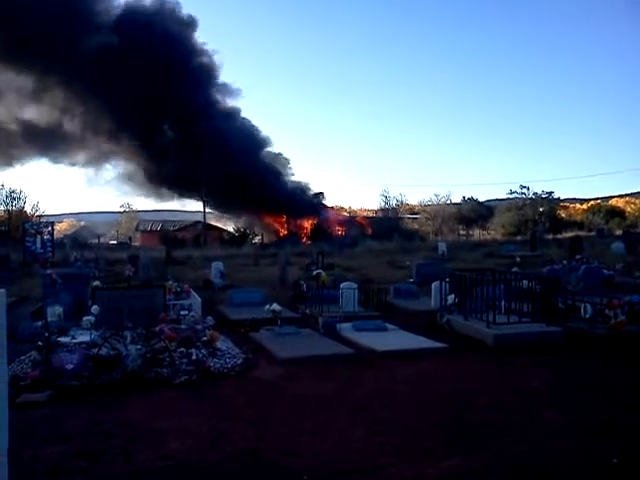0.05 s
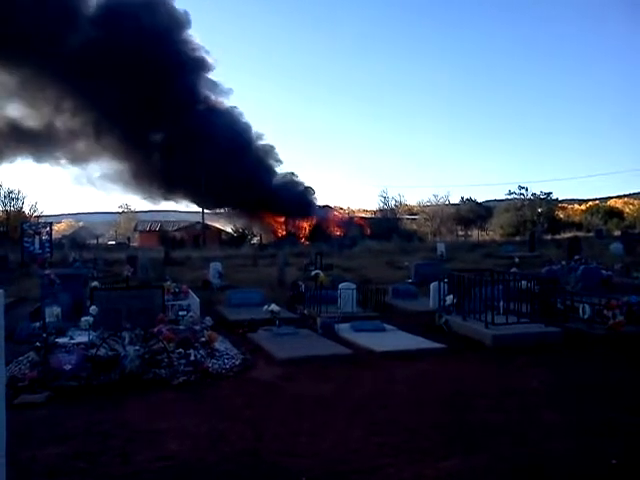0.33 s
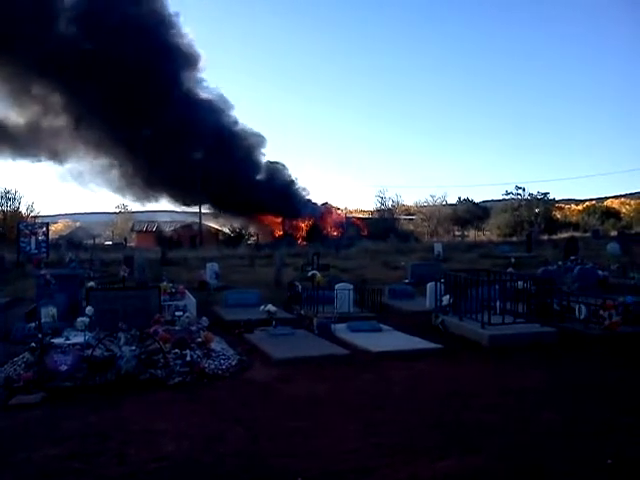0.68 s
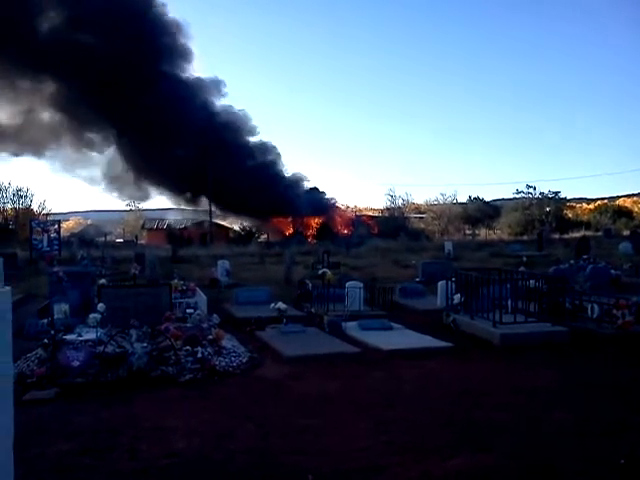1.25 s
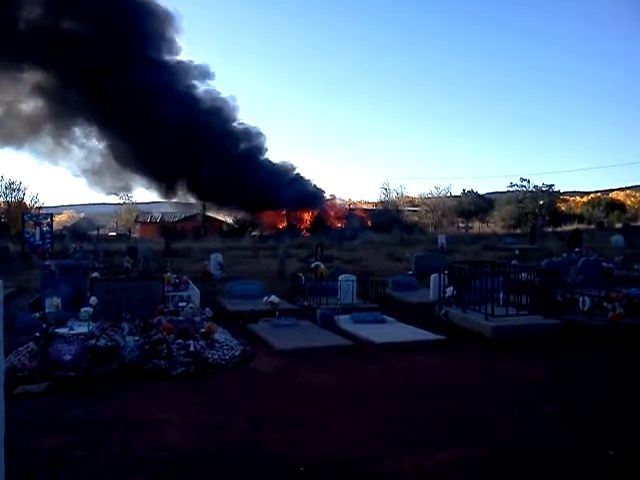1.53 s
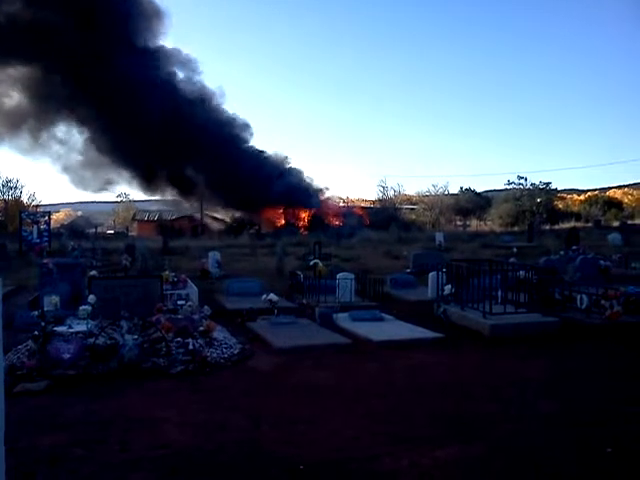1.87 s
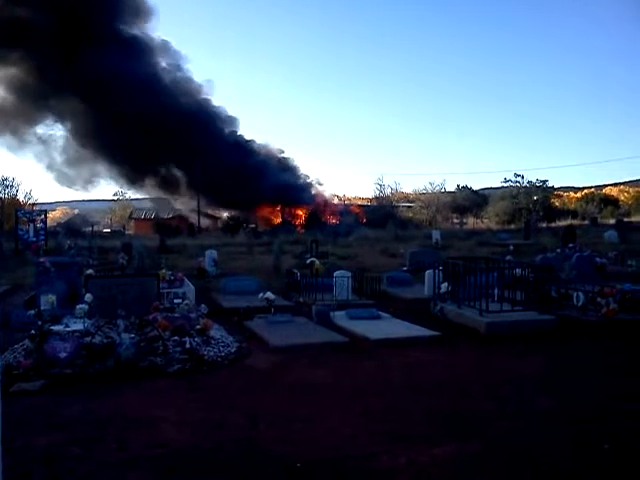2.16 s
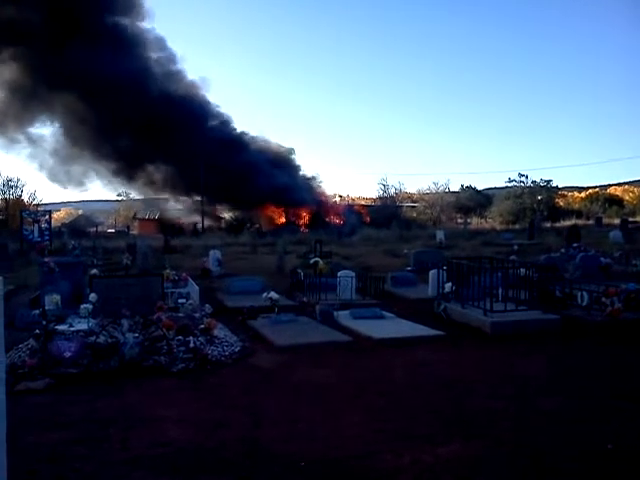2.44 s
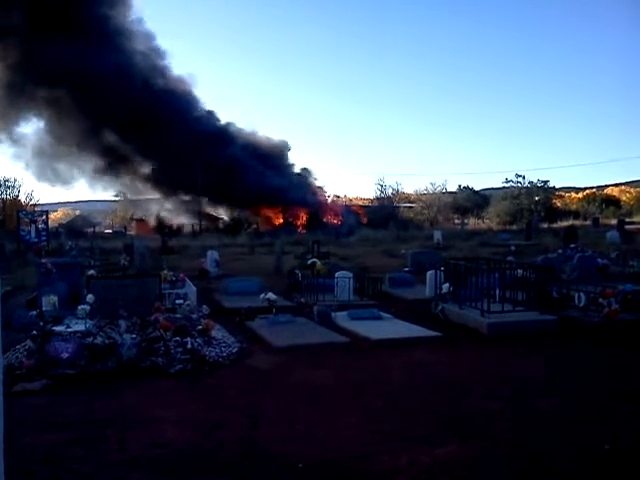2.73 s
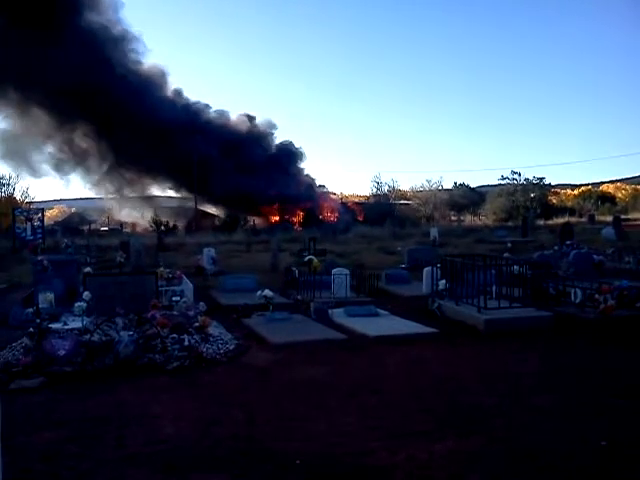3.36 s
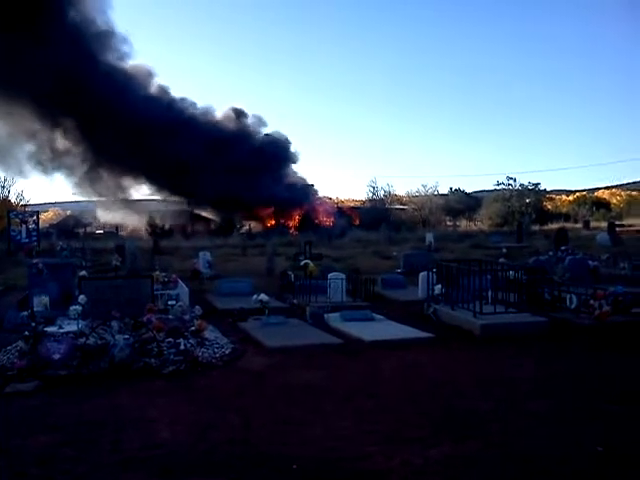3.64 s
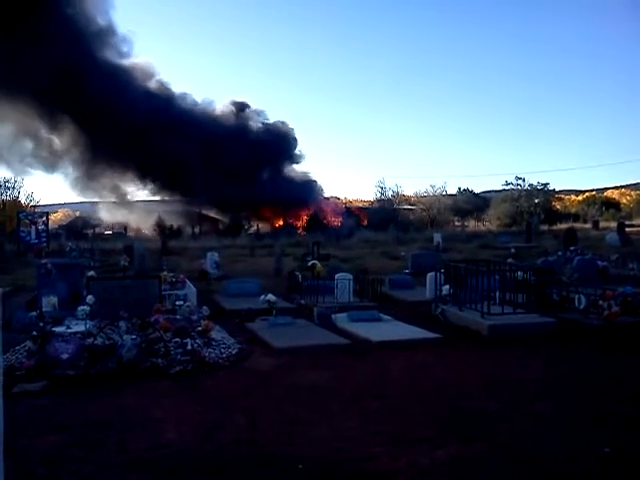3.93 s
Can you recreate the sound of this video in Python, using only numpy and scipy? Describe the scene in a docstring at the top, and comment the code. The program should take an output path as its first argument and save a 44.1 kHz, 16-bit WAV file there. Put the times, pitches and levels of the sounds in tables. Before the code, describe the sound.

A big fire roars low and steady some way off outdoors for all four seconds, with irregular wood crackles throughout, dulled by distance and slightly ringing. Stronger cracks come around 0.9 seconds and between 2 and 2.3. A thin hiss swells at about 1.6 seconds and again at 3.3. At about 3.4 seconds, one loud, sharp, hollow pop echoes briefly while the fire carries on.

```python
"""A big fire across open ground

Swirling flames roar steadily some way off, and a thin hiss comes and goes. Burning timber splits
and crackles throughout. Once, something bursts with a sharp pop that scatters back from the
surroundings. Distance dulls the crackle, and the microphone adds a ringing midrange colour."""
import sys
import numpy as np
from scipy import signal
from scipy.fft import rfft, irfft, next_fast_len
from scipy.io import wavfile
from scipy.ndimage import uniform_filter1d, minimum_filter1d, map_coordinates

SR = 44100
rng = np.random.default_rng(int(sys.argv[2]) if len(sys.argv) > 2 else 0)


def master(y):
    """Save y as 16-bit WAV."""
    cut = np.clip(np.atleast_2d(y).T, -1, 1)
    pcm = np.round(cut * 32767)  # scale
    wavfile.write(sys.argv[1], SR, pcm.astype(np.int16))


N = 4 * SR


def amp(db):
    """Turn decibels into a number to multiply a sound by."""
    return 10 ** (np.asarray(db) / 20)


def unit(x):
    """Scale a signal to an average strength (rms) of 1."""
    return x / np.sqrt(np.mean(x ** 2) + 1e-20)


def curve(rows):
    """Join (time, value) points with straight lines, giving one value per sample."""
    return np.interp(np.arange(N) / SR, *np.transpose(rows))


def wobble(per_s):
    """A smooth curve through per_s random values each second."""
    return map_coordinates(rng.standard_normal(2000), [np.arange(N) * per_s / SR], mode="wrap")


def filtered(x, response):
    """Multiply each frequency in x by response(hz)."""
    size = next_fast_len(N + 8192)
    return irfft(rfft(x, size) * response(np.fft.rfftfreq(size, 1 / SR)), size)[:N]


def noise(spectrum, patchy_db=0):
    """Noise of strength 1 with the given tone; patchy_db makes random patches louder or softer."""
    grid = signal.stft(rng.standard_normal(N), nperseg=512)[2]  # frequency by time
    patches = uniform_filter1d(rng.standard_normal(grid.shape), 6, axis=0)
    patches = uniform_filter1d(patches, 12, axis=1)
    patchy = signal.istft(grid * amp(patchy_db * unit(patches)), nperseg=512)[1][:N]
    f, db = np.transpose(spectrum)
    return unit(filtered(patchy, lambda hz: amp(np.interp(np.log(hz + 1), np.log(f + 1), db, right=-120))))


# How strongly the fire burns: t/s, deep roar level/dB, bright rush level/dB
FLAME_LEVELS = [(0.0, -47.5, -44), (0.39, -45.5, -46), (0.83, -47.5, -47), (1.32, -46.5, -45.5),
                (1.67, -47.5, -45.5), (2.02, -43, -45), (2.35, -46, -46), (2.7, -44.5, -43),
                (2.96, -47.5, -48), (3.15, -46, -46), (3.42, -44.5, -46), (3.73, -48, -43.5),
                (3.88, -47.5, -40.5), (4.0, -47.5, -50)]
# Tone of the deep roar: f/Hz, relative level/dB
DEEP_TONE = [(20, -37), (35, -28.5), (60, -17.5), (140, -12.5), (185, -8), (206, 0.5), (228, -3), (265, -3),
             (305, 2.5), (345, 0.5), (410, -3.5), (520, -1), (700, -2), (900, -3), (1100, -16),
             (1500, -34.5)]
# Tone of the bright rush: f/Hz, relative level/dB
BRIGHT_TONE = [(500, -25), (850, -12), (1080, -5), (1350, -1), (1700, -5.5), (2100, -1.5), (2500, -9),
               (3100, -13.5), (3600, -19), (4200, -35.5), (4600, -66)]


def roar():
    """Swirling flames make a deep, even roar and a brighter rush that flutters more."""
    times, deep_db, bright_db = np.transpose(FLAME_LEVELS)
    deep_gain = amp(curve(np.c_[times, deep_db]) + 0.5 * wobble(30))
    deep = deep_gain * noise(DEEP_TONE, patchy_db=2)
    bright_gain = amp(curve(np.c_[times, bright_db]) - 1.5 + 0.46 * wobble(14) + 1.7 * wobble(130))
    return deep + bright_gain * noise(BRIGHT_TONE, patchy_db=1.43)


# How the hiss comes and goes: t/s, level/dB
HISS_SWELLS = [(0, -69.5), (.7, -71), (1.42, -67.5), (1.62, -56), (2.0, -56.5), (2.08, -71.5), (2.3, -63.5),
               (2.55, -63), (2.9, -69.5), (3.25, -73), (3.305, -47.5), (3.45, -53), (3.65, -59.5), (4, -70)]
# Tone of the hiss: f/Hz, relative level/dB
HISS_TONE = [(750, -18.5), (1150, 7.5), (1700, -4), (2200, -1), (2800, -11), (3250, -2), (3550, 2),
             (3750, -5.5), (4000, -12), (4400, -23), (4700, -59)]


def hiss():
    """A thin, grainy sizzle swells twice over the roar."""
    grain = amp(3.5 * wobble(170))
    return amp(curve(HISS_SWELLS) + 5.5) * unit(grain * noise(HISS_TONE, patchy_db=3))


# The clear cracks, each with a main, a low and a high ring:
# t/s, level/dB, low ring level/dB and high ring level/dB (relative to the main), main ring f/Hz
CLEAR_CRACKS = [(0.0623, -42, 3, -16, 1830), (0.196, -34.5, -12, -20, 2270), (0.413, -32, -13, -3.5, 2040),
                (0.4774, -42, -10, -22, 1890), (0.5763, -33, -11, -12, 2050),
                (0.6028, -29.5, -19, -25.5, 2080), (0.7334, -33, -9, -8.5, 2300),
                (0.7438, -27.5, -13.5, -4, 2054), (0.9084, -20.5, -19, -33, 1975),
                (0.9445, -19.5, 3, -28, 2140), (0.9485, -27.5, 4, -15, 2150), (1.0001, -26.5, 0, -34, 2075),
                (1.1727, -34, -11, -26, 1960), (1.2366, -35, -13, -9, 2000),
                (1.2585, -27.5, -13, -15, 1985), (1.3853, -31, -1, -8, 1800), (1.513, -24.5, -1, -10, 2125),
                (1.5748, -28.5, -13, -3, 2120), (1.7502, -37, -10, -19, 2200),
                (1.8032, -24.5, -10.5, -30, 2014), (2.0517, -18.5, -14, -23, 1913),
                (2.1316, -34.5, -7, -24, 2080), (2.1929, -31, -25.5, -20, 2060),
                (2.2625, -30, -7, -30, 2040), (2.2805, -19.5, 0.5, -32.5, 1994),
                (2.2893, -21.5, -0.5, -27, 2100), (2.3481, -33, 1, -28, 1915),
                (2.3747, -29, -2, -1.5, 2010), (2.5413, -26, -39, -13, 2126), (2.6508, -20, -5, -32, 2030),
                (2.7867, -24.5, -26, -32, 2160), (2.9392, -32.5, 2, -11.5, 2100),
                (3.05, -28, -3, -25, 1920), (3.1183, -34, 1, -13, 2180), (3.1507, -23.5, -13, -25, 2200),
                (3.274, -28.5, -2, -1, 2170), (3.5468, -25, -3.5, -24, 1970),
                (3.7005, -20.5, -8.5, -13, 2110), (3.7444, -35, -7, -15, 2070), (3.7819, -26, -2, -4, 1980)]
# The main, low and high microphone resonances that each crack sets ringing:
# multiple of the main pitch, time to fade by 60 dB/s
CRACK_RESONANCES = [(1, 0.023), (.69, 0.015), (1.36, 0.0042)]
# Tone of the splinters: f/Hz, relative level/dB
SPLINTER_TONE = [(100, -19), (500, -13), (1300, -6.5), (2100, -1), (2900, -7.5), (3700, -18.5),
                 (4500, -44.5)]


def crackle(faint_per_s=96, muffle_hz=4000):
    """Timber splits: each crack sprays splinters, echoes and makes the microphone ring briefly."""
    t = np.arange(SR // 20) / SR
    rise_s, hold_s = 0.0011, 0.0023
    rings, spray, echo_power = np.zeros((3, N))
    splinters = noise(SPLINTER_TONE)
    cracks = list(CLEAR_CRACKS)
    # Add many faint cracks at random, with the same five columns.
    for when, softness, low, high, pitch in rng.random((faint_per_s * N // SR, 5)):
        db = -45.5 - 2 * np.log(max(softness, 0.05))
        cracks.append((when * N / SR, db, 14 * low - 9, 12 * high - 14, 1690 + 620 * pitch))
    for start, db, low_db, high_db, main_hz in cracks:
        gains = amp([0, low_db, high_db])
        gains *= amp(db - 2) / np.linalg.norm(gains)  # the three rings share the crack's level
        for gain, (multiple, fade_s) in zip(gains, CRACK_RESONANCES):
            hz = main_hz * multiple * (1 + 0.015 * rng.standard_normal())  # slightly out of tune
            add(rings, start, gain * strike(t, rise_s, fade_s, hold_s) * np.sin(2 * np.pi * hz * t))
        add(spray, start, amp(db - 11.5) * strike(t, rise_s, fade_s=0.016, hold_s=hold_s))
        add(echo_power, start, (amp(db - 26.5) * strike(t, rise_s=0.0018, fade_s=0.09)) ** 2)
    sound = rings + (spray + np.sqrt(echo_power)) * splinters
    return filtered(sound, lambda hz: 1 / np.sqrt(1 + (hz / muffle_hz) ** 36))  # distance dulls it


def strike(t, rise_s, fade_s, hold_s=0):
    """The loudness of a hit: it rises fast, holds, then drops 60 dB every fade_s seconds."""
    return (1 - np.exp(-(t / rise_s) ** 2)) * amp(-60 * np.maximum(t - hold_s, 0) / fade_s)


def add(track, start_s, sound):
    """Mix a sound into the track at the given time."""
    part = track[max(round(start_s * SR), 0):][:len(sound)]
    part += sound[:len(part)]


# The notes that ring in the pop: f/Hz, relative level/dB, time to fade by 60 dB/s
POP_NOTES = [(631, -11.5, 0.022), (772, -6, 0.0087), (1220, -11, 0.02), (1452, -0.5, .018),
             (2045, -6, 0.014), (3520, -22, 0.0064)]
# The pop's lead-in, main burst and two nearby echoes: t/s from the main burst, relative level/dB
POP_HITS = [(-.0039, -13), (0, 6), (.0112, -18), (.021, -24.5)]
# Sound scattered back from near and far: level/dB, time to fade by 60 dB/s
ECHO_TAILS = [(-18.5, 0.06), (-38, 0.84)]
# Tone of that scattered sound: f/Hz, relative level/dB
ECHO_TONE = [(200, -44.5), (600, -34), (1000, -4), (1400, -5.5), (1750, -4), (2100, -6.5), (2700, -16.5),
             (4000, -26), (4600, -61.5)]


def pop(start_s=3.3662, bass_cut_hz=430, snap_hz=7820):
    """Something bursts with a hollow ring and a bright snap, and the surroundings echo it."""
    t = np.arange(SR) / SR
    burst = np.zeros(SR)
    for k, (hz, db, fade_s) in enumerate(POP_NOTES):
        loudness = amp(db) * strike(t, rise_s=0.0011, fade_s=fade_s, hold_s=0.0016)
        burst += (-1) ** k * loudness * np.sin(2 * np.pi * hz * t)  # every other wave is flipped
    hits, click, tail = np.zeros((3, N))
    for delay_s, db in POP_HITS:
        add(hits, start_s + delay_s, amp(db - 7.5) * burst)
    hollow = filtered(hits, lambda hz: (hz / bass_cut_hz) ** 3 / np.sqrt(1 + (hz / bass_cut_hz) ** 6))
    add(click, start_s + 0.002, amp([-5.5]))  # one sample long
    snap = filtered(click, lambda hz: np.exp(-(hz / snap_hz) ** 2))
    for db, fade_s in ECHO_TAILS:
        add(tail, start_s, amp(db) * strike(t, rise_s=0.002, fade_s=fade_s))
    return hollow + snap + tail * noise(ECHO_TONE)


def scene():
    """The whole fire, in one channel."""
    return (roar() + hiss() + crackle() + pop())[None]


def record(dry):
    """A limiter turns the volume down for an instant at the pop; the highest treble is cut off."""
    ceiling_db, top_hz = -2, 16000
    needed = np.minimum(1, amp(ceiling_db) / (np.abs(dry[0]) + 1e-9))
    held = minimum_filter1d(needed, size=61)
    smooth_gain = uniform_filter1d(uniform_filter1d(held, size=31), size=31)
    return filtered(smooth_gain * dry[0], lambda hz: hz < top_hz)[None]


dry = scene()
out = record(dry)
master(out)
```